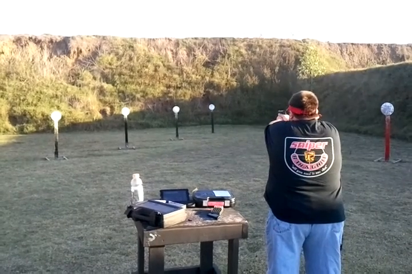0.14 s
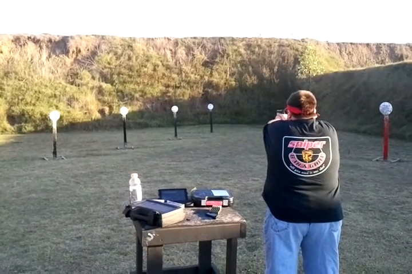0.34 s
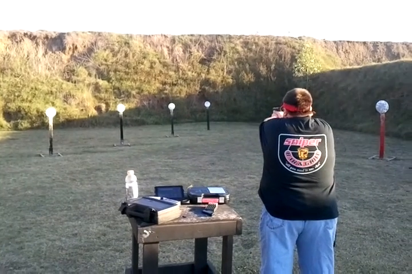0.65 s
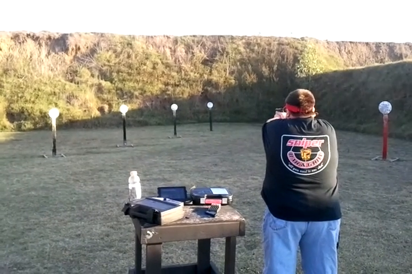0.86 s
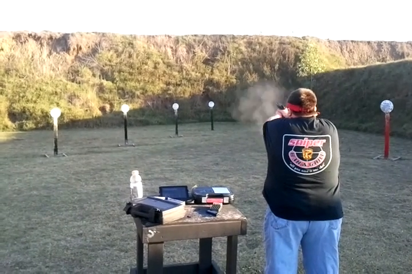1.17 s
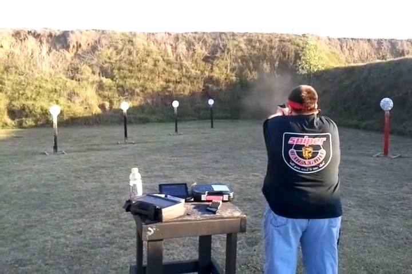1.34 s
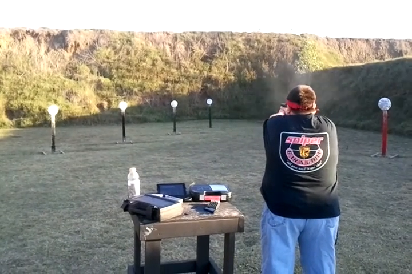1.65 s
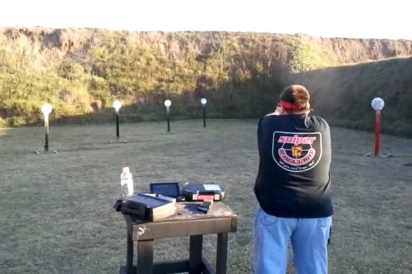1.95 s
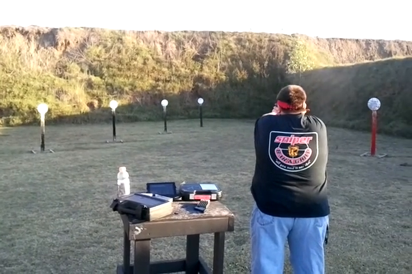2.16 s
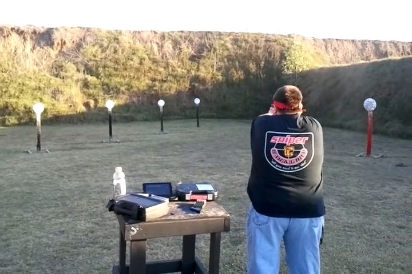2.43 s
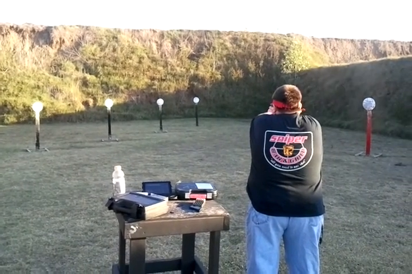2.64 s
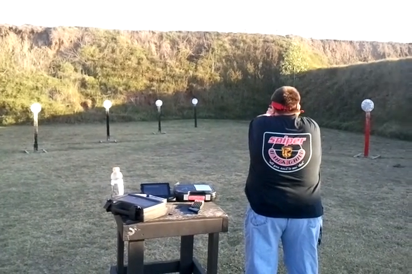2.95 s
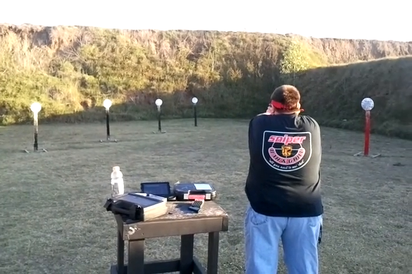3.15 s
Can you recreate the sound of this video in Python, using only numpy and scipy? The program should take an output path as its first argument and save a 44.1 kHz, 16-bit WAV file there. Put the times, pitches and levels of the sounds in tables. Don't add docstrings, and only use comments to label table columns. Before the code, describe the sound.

A single loud pistol shot outdoors, then a ringing bullet strike on a steel plate.

```python
import sys
import numpy as np
from scipy import signal
from scipy.fft import rfft, irfft
from scipy.io import wavfile
from scipy.ndimage import uniform_filter1d

SR = 44100
rng = np.random.default_rng(int(sys.argv[2]) if len(sys.argv) > 2 else 0)


def wav_out(sig):
    wavfile.write(sys.argv[1], SR, np.round(np.clip(np.atleast_2d(sig).T, -1, 1) * 32767).astype(np.int16))


def nominal_scale(level):
    x = np.asarray(level, float) / 20
    return 10 ** x


N = 145530


def evened(x):
    return x / np.sqrt(np.mean(x ** 2) + 1e-20)


def noise(points):
    f, db = np.transpose(points)
    hz = np.fft.rfftfreq(N, 1 / SR)
    gain = nominal_scale(np.interp(np.log(hz + 1), np.log(f + 1), db, left=-70, right=-70))
    return evened(irfft(rfft(rng.standard_normal(N)) * gain, N))


def wobble(size):
    once = uniform_filter1d(rng.standard_normal(N), size=size)
    return evened(uniform_filter1d(once, size=size))


def shape(start, rise, hold, t60):
    t = np.arange(N) / SR - start
    return np.clip(t / rise, 0, 1) * nominal_scale(-60 * np.clip(t - hold, 0, 3 * t60) / t60)


def tone(hz):
    return np.sqrt(2) * np.sin(2 * np.pi * np.cumsum(hz) / SR)


def resonate(x, hz, width):
    turn = np.exp(2j * np.pi * hz * np.arange(len(x)) / SR)
    r = np.exp(-np.pi * width / SR)
    return 2 * (turn * signal.lfilter([1 - r], [1, -r], x / turn)).real


def muzzle(bright, dull):
    # t/s, f/Hz, level/dB, t60/s
    thump = (1.2598, 170, -5, .07)
    blast_s, hammer_lead_s = 1.2598, 0.003
    blast = nominal_scale(6) * shape(blast_s, 0.00032, 0.0085, 0.024)
    hammer = nominal_scale(-27.5) * shape(blast_s - hammer_lead_s, 0.0015, hammer_lead_s, 0.0093)
    s, hz, db, t60 = thump
    push = nominal_scale(db) * shape(s, .001, .004, t60) * np.sin(2 * np.pi * hz * (np.arange(N) / SR - s))
    return (blast + hammer) * (bright + 0.41 * dull) + push


def echoes(returns, bright, dull):
    crack_power, boom_power = np.zeros(N), np.zeros(N)
    for s, hold, crack_db, boom_db, t60 in returns:
        power = shape(s, .002, hold, t60) ** 2
        crack_power += power * nominal_scale(2 * crack_db)
        boom_power += power * nominal_scale(2 * boom_db)
    shared = wobble(size=60)
    crack = nominal_scale(2 * shared) * np.sqrt(crack_power) * bright
    boom = nominal_scale(1.8 * shared + 1.5 * wobble(size=200)) * np.sqrt(boom_power) * dull
    return crack + boom


def shot():
    # f/Hz, level/dB
    crack_colour, boom_colour = [(1200, -25), (2500, -11.5), (3800, -7), (4600, 3), (5500, -6.5),
                                 (6800, -9), (8000, -13.5)], [(100, -2.5), (300, -11.5), (650, -3), (1000, -3),
                                                 (1500, -10.5), (2500, -15.5), (4000, -27.5)]
    hill_colour, grass_colour = [(100, -21), (300, -17.5), (600, -8), (1000, -1), (1500, -5.5),
                                 (2500, -13.5), (4000, -23.5)], [(1200, -22.5), (2400, -5), (3300, -13.5), (4300, 1.5),
                                                (5100, 1.5), (5900, -10), (6800, -9.5), (8000, -21.5)]
    # t/s, hold/s, crack level/dB, boom level/dB, t60/s
    near = [
        (1.293, 0.006, -25.5, -29, .05),
        (1.3, 0.002, -16, -13, 0.04),
        (1.3045, 0.003, -11, -11, 0.02),
        (1.3125, 0.004, -10, -13.5, .025),
        (1.321, 0.0038, -9.5, -13, 0.068),
        (1.339, 0.018, -9, -22, 0.05),
        (1.359, .012, -19, -30, .1),
        (1.375, 0.018, -14.5, -24.5, .1),
        (1.396, 0.017, -18, -24, 0.061),
    ]
    berms = [
        (1.419, 0.034, -27.5, -40.5, 0.28),
        (1.485, 0.04, -30, -47.5, 0.23),
        (1.515, 0.033, -33, -39, 0.15),
        (1.555, 0.03, -28.5, -39, 0.084),
        (1.59, 0.015, -33, -39.5, 0.055),
        (1.617, 0.12, -46.5, -53, 0.6),
        (1.755, 0.024, -55, -62, 0.18),
    ]
    far = [(0.0, .12, -52.5, -51.5, 0.55), (.35, 0.077, -55.5, -50.5, 0.68),
           (0.415, 0.0065, -47, -45, 0.07), (0.749, 0.25, -79, -59, 0.67), (1.74, 0.032, -62, -45.5, 0.45),
           (1.889, 0.041, -49, -51, 0.23), (1.99, 0.078, -53.5, -56.5, 0.37),
           (2.139, 0.088, -57, -52.5, 0.26), (2.216, 0.0086, -55, -47.5, 0.12),
           (2.279, 0.04, -62, -55.5, 0.29), (2.499, 0.17, -67.5, -58, 0.65)]
    bright, dull, hills = noise(crack_colour), noise(boom_colour), noise(hill_colour)
    out = muzzle(bright, dull)
    out = out + echoes(near, bright, dull)
    out = out + echoes(berms, noise(grass_colour), hills)
    return out + echoes(far, bright, hills)


def plate():
    modes = [4387, 6159, 2874]
    # t/s, level/dB, rise/s, t60/s, shift/Hz
    swings = [
        [(1.338, -18.5, 0.0092, .2, 12.5), (1.368, -14.5, 0.01, 0.14, 3.5), (1.403, -9, 0.022, 0.27, -5.5),
         (1.512, -17, 0.046, 0.21, 6.5), (1.605, -35.5, 0.055, 0.24, 5.5), (1.755, -48, 0.013, 0.3, 7),
         (1.99, -64, .03, 1.1, 3), (2.245, -56.5, 0.024, 0.24, 4), (2.33, -68.5, 0.097, .2, 5)],
        [(1.362, -21, 0.011, 0.35, -10.5), (1.386, -15, .014, 0.12, 4), (1.455, -31.5, 0.032, 0.37, 2),
         (1.6, -32, 0.028, 0.2, 11), (1.72, -55.5, 0.021, 0.55, 12.5)],
        [(1.336, -29, 0.0097, 0.77, -1), (1.49, -31, .04, 0.18, -2.5), (2.25, -58.5, 0.02, 0.3, 2.5),
         (2.3, -60, 0.022, 0.18, -23)],
    ]
    out = np.zeros(N)
    for hz, swells in zip(modes, swings):
        envs = np.array([nominal_scale(db) * shape(s, rise, rise, t60) for s, db, rise, t60, _ in swells])
        env = envs.sum(axis=0)
        shift = np.transpose(swells)[-1] @ envs / (env + 1e-12)
        flutter = nominal_scale(4.0 * wobble(size=300) / (1 + env / nominal_scale(-50.5)))
        out = out + tone(hz + shift) * env * flutter
    return out


def knocks():
    # t/s, hold/s, level/dB, t60/s
    hits = [
        (.257, .012, -48, .05),
        (0.417, 0.0038, -48.5, 0.035),
        (1.994, 0.008, -50, 0.077),
        (2.045, .008, -54, .05),
        (2.19, .012, -49, .05),
        (2.216, 0.0064, -43.5, 0.062),
        (2.283, .006, -52.5, .04),
        (2.303, .005, -53, .04),
    ]
    # f/Hz, level/dB
    colour = [(200, -10), (350, 1.5), (700, -1.5), (1300, -10), (2500, -26)]
    return noise(colour) * sum(nominal_scale(db) * shape(s, .002, hold, t60) for s, hold, db, t60 in hits)


def slaps():
    # t/s, f/Hz, level/dB, length/s
    notes = [(.349, 1120, -43, .017), (2.149, 1110, -44, .019), (2.178, 1070, -53, .03),
             (.158, 1680, -57, .03), (.163, 4750, -57, .05), (2.235, 1660, -54, .028),
             (2.102, 2740, -57, .035), (2.155, 2790, -56, .04), (.005, 1700, -57, .06),
             (.085, 1700, -57, .05), (.21, 1690, -60, .03), (.01, 2860, -58, .04), (.34, 2850, -61, .1),
             (2.22, 4750, -58, .02), (1.335, 2480, -29, .035)]
    t, out = np.arange(N) / SR, np.zeros(N)
    waver = wobble(size=150)
    for s, hz, db, length in notes:
        lift = .1 * (hz < 1200) * np.clip((t - s) / length, 0, 1.3) ** 3
        level = nominal_scale(db + 2.0 * waver) * shape(s, .003, length, .03)
        out = out + level * tone(hz * (1 + lift) + 12 * waver)
    return out


def brass():
    # t/s, middle ring level/dB, low ring level/dB, high ring level/dB, rattle/ms
    early, late = [(.0205, -28.5, -48, -45, 2.4), (.16, -35, -65, -47, 8.6), (.3311, -30.5, -58, -34, 5.9),
                   (.3826, -32, -48, -36, 6.8), (.414, -41, -51, -43, 2.9), (.449, -39, -58, -38, 6.46),
                   (.478, -51, -60, -49, 6), (.488, -39, -44.5, -62, 1.8), (.5014, -42, -50, -51, 3),
                   (.5406, -47, -49, -64, 2), (.7585, -49, -52.5, -53, 2), (.9558, -46, -68, -45, 3)], [(1.9844, -21.5, -36, -32.5, 4), (2.085, -31.5, -43.5, -59, 10),
                                  (2.1126, -28.5, -57, -44.5, 1.2), (2.1427, -39, -60.5, -61, 4),
                                  (2.184, -33, -44, -65, 2.8), (2.2865, -36.5, -44, -65.5, 2.6),
                                  (2.342, -44, -45, -66, 1.3), (2.4025, -44, -65, -52.5, 2),
                                  (2.837, -23, -39, -32, 5.7), (2.883, -45, -61, -47.5, 16),
                                  (2.9155, -29.5, -51.5, -42, 2.8), (2.9638, -41.5, -54.5, -53.5, 2)]
    clacks = [
        (1.6955, -22, -34, -28, 8.8),
        (1.7134, -24, -41, -37, 6.5),
        (1.8647, -16.5, -34, -62, 3.6),
        (1.8724, -22, -35, -52, 7.2),
    ]
    # f/Hz, width/Hz, level/dB
    early_case = [
        [(4330, 94, 0)],
        [(2470, 390, 0)],
        [(5184, 150, 5.5), (5610, 82, 1), (6600, 66, -24)],
    ]
    late_case = [
        [(4255, 220, 0)],
        [(2480, 154, 4), (2030, 110, -14.5), (1620, 170, -5)],
        [(4820, 110, 6), (5550, 60, 12.5), (6780, 180, -34)],
    ]
    bench = [
        [(4366, 128, 0), (3620, 81, -22)],
        [(2700, 110, 3), (1910, 240, -12)],
        [(5010, 160, 11), (6540, 280, -15)],
    ]
    out, t = np.zeros(N), np.arange(4000) / SR
    for ticks, body in (early, early_case), (late, late_case), (clacks, bench):
        for s, middle_db, low_db, high_db, rattle in ticks:
            t60 = 0.064 * (rattle + 2.8) / 10
            drive = nominal_scale(-60 * np.maximum(t - rattle / 1e3, 0) / t60) * rng.standard_normal(len(t))
            drive[0] = 14
            for db, rings in zip([middle_db - 10.5, low_db, high_db], body):
                ring = sum(nominal_scale(ring_db) * resonate(drive, hz, width) for hz, width, ring_db in rings)
                ring = ring / np.sqrt(np.mean(ring[:400] ** 2))
                part = out[round(s * SR):][:len(t)]
                part += (nominal_scale(db - 4.5) * ring)[:len(part)]
    return out


def air():
    # f/Hz, density/dB
    wind_colour, hiss_colour = [(4.7, -29.5), (8.0, -8), (16, -14), (27, -14), (67, -17), (108, -28),
                                (250, -43.5), (320, -83.5), (550, -120)], [(88, -49.5), (150, -8.5), (222, -3), (449, -10), (487, -11.5),
                                              (1280, -15), (1440, -23.5), (4900, -20.5), (7500, -23),
                                              (9750, -70.5), (16500, -120)]
    # t/s, length/s, level/dB
    sag = (1.36, .15, -10)
    s, length, duck_db = sag
    duck = nominal_scale(duck_db * shape(s, .02, length, 0.304))
    wind = nominal_scale(-37.5 + 1.8 * wobble(size=2000)) * duck * noise(wind_colour)
    hiss = nominal_scale(-55 + .9 * wobble(size=3000)) * noise(hiss_colour)
    return wind + hiss


def scene():
    return (shot() + plate() + knocks() + slaps() + brass() + air())[None]


def band_limited(x, edge_hz):
    taps = signal.firwin(91, edge_hz, window=("kaiser", 8), fs=SR)
    return signal.oaconvolve(x, taps, "same")


def band_limit(x):
    return signal.sosfilt(signal.butter(12, 15870, fs=SR, output="sos"), x)


def record(dry):
    # t/s, offset/full scale
    swing = [
        (1.266, -0.0058),
        (1.2715, -0.97),
        (1.292, -0.26),
        (1.3, -0.081),
        (1.321, 0.14),
        (1.324, 0.89),
        (1.339, 0.36),
        (1.39, 0.16),
        (1.62, 0.00024),
    ]
    # t/s, length/s, level/dB
    leaks = [
        (1.26, 0.0091, -15),
        (1.34, 0.0072, -18),
        (1.3545, .0015, -17),
        (1.407, .001, -21.5),
        (1.4105, 0.002, -13),
        (1.4265, .001, -25),
    ]
    offset, rail_low, rail_high = -.168, -.515, .55
    bias = uniform_filter1d(np.interp(np.arange(N) / SR, *np.transpose(swing)), size=40)
    railed = np.clip(dry[0] + offset + bias, rail_low, rail_high) - offset
    railed = railed + 0.013 * np.minimum(dry[0], 1)
    kept, fringe = band_limited(railed, 6736), band_limited(railed, 8300)
    gate = sum(nominal_scale(db) * shape(s, 0.00061, length, .004) for s, length, db in leaks)
    out = kept + nominal_scale(-19) * (fringe - kept) + gate * (railed - fringe) + offset
    return band_limit(out[None])


dry = scene()
out = record(dry)
wav_out(out)
```